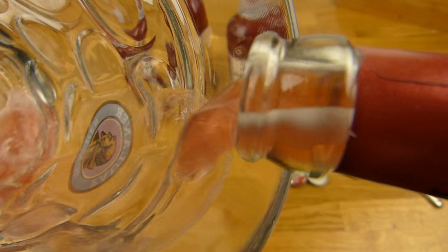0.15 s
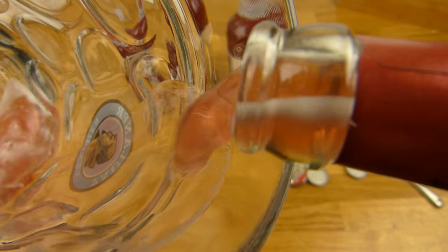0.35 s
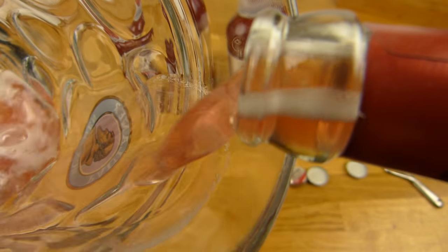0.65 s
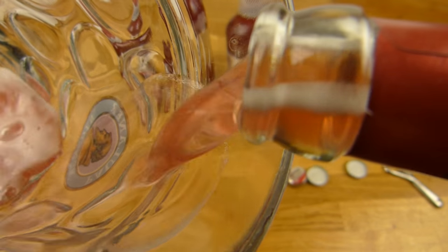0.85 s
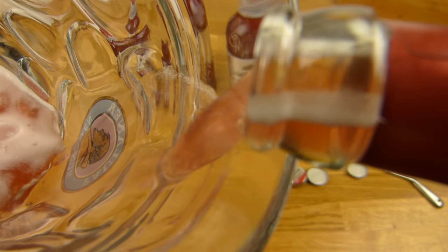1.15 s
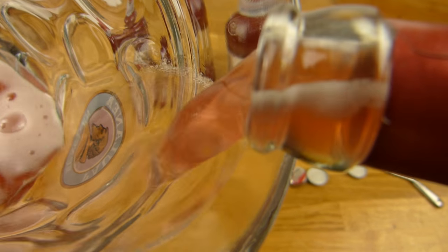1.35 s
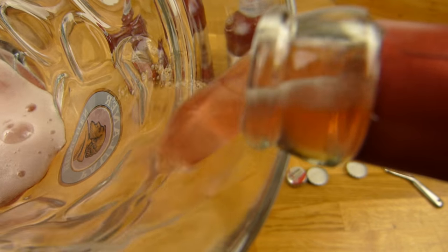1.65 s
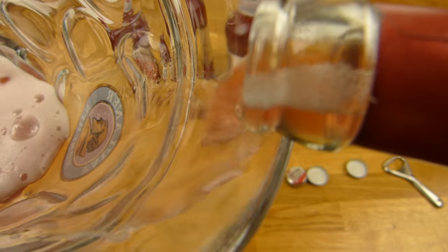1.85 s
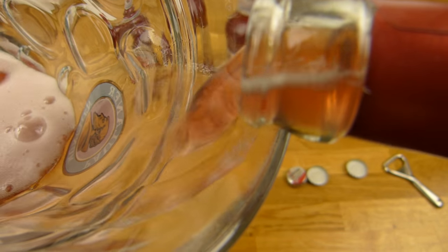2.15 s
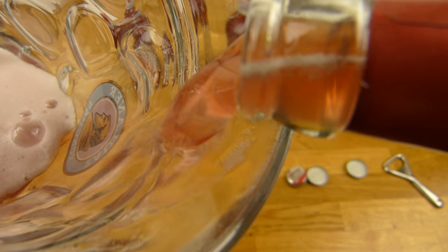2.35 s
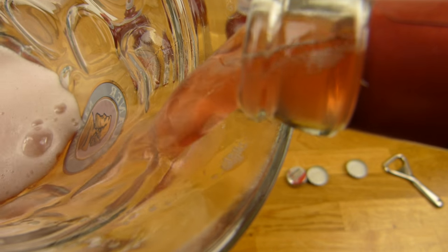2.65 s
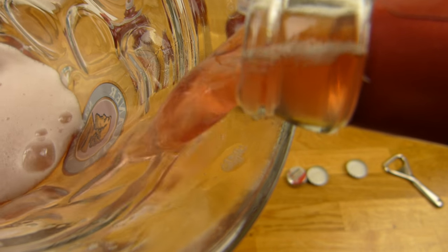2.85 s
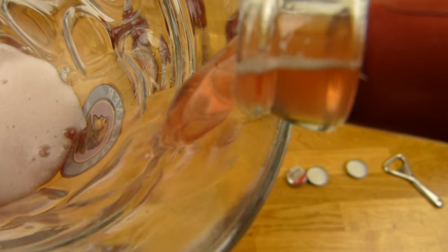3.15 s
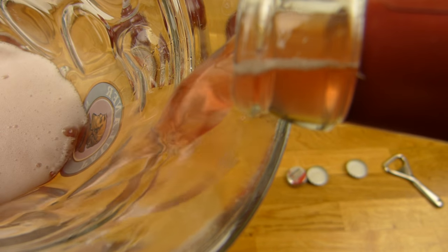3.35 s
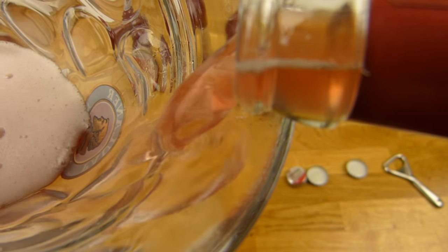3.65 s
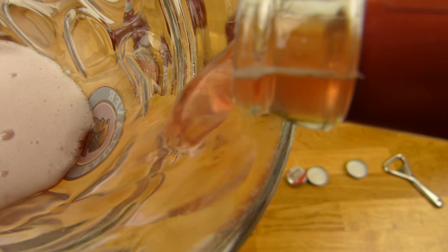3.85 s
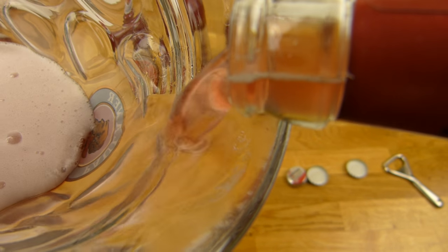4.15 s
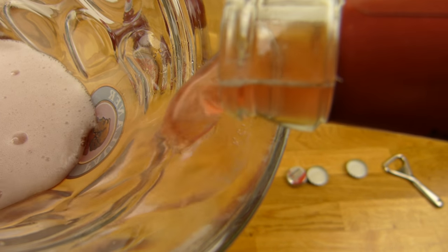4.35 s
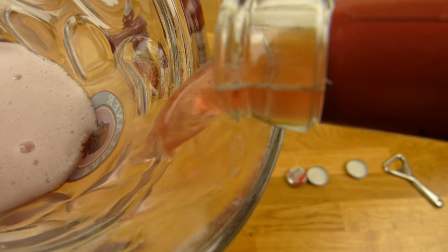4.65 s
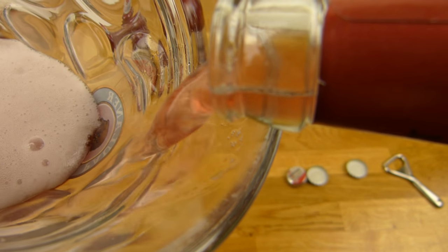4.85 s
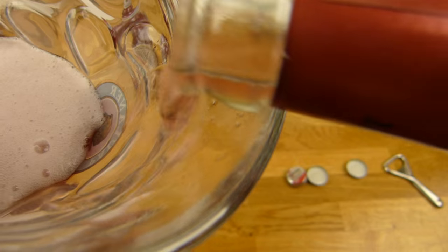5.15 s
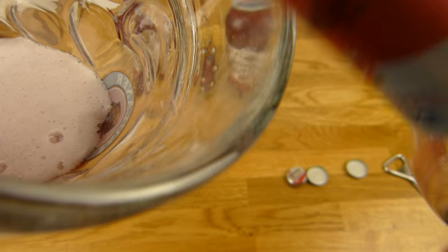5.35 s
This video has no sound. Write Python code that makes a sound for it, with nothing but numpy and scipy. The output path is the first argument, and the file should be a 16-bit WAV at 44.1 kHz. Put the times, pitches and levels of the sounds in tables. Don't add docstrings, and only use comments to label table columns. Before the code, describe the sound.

Close stereo pickup of a beer pour with little room echo. Bubbles gulp in the bottle neck, slugs of liquid slap into the mug and spatter, and glugs slow and fade. Fizz builds into an even, bright, crackling hiss with a slight hollow glass colour. Light glass taps occur near two seconds; toward the end the bottle clinks, knocks, rattles and slides on the rim over the fizz.

```python
import sys
import numpy as np
from scipy import signal
from scipy.fft import rfft, irfft
from scipy.io import wavfile
from scipy.ndimage import uniform_filter1d

SR = 44100
rng = np.random.default_rng(int(sys.argv[2]) if len(sys.argv) > 2 else 0)


def dump(signal):
    limited = np.clip(np.atleast_2d(signal).T, -1, 1)
    pcm = np.round(limited * 32767).astype(np.int16)
    wavfile.write(sys.argv[1], SR, pcm)


def linear_from_db(decibels):
    return 10 ** (np.asarray(decibels, float) / 20)


N = 242550


def evened(x):
    return x / np.sqrt(np.mean(x ** 2) + 1e-20)


def read(points, hz):
    f, value = np.transpose(points)
    return np.interp(np.log(hz + 1), np.log(f + 1), value)


def curve(rows, column=1):
    return np.interp(np.arange(N) / SR, np.array(rows)[:, 0], np.array(rows)[:, column])


def add(mix, s, sound):
    part = mix[..., round(s * SR):][..., :sound.shape[-1]]
    part += sound[..., :part.shape[-1]]


def cut(x, hz, kind):
    return signal.sosfilt(signal.butter(3, hz, kind, fs=SR, output="sos"), x)


def resonate(x, hz, width):
    return signal.lfilter(*signal.iirpeak(hz, hz / width, SR), x)


def colour(x, points):
    return irfft(rfft(x) * linear_from_db(read(points, np.fft.rfftfreq(N, 1 / SR))), N)


# (frequency [Hz], correlation)
LIKENESS = [(60, 0.16), (120, 0.82), (240, -0.55), (480, -0.66), (950, -0.54), (1890, 0.71), (3770, 0.91),
            (7520, 0.82), (15000, 0.85)]
# (frequency [Hz], left over right [dB])
BALANCE = [(60, 0.0), (120, -1), (240, -0.5), (480, 0), (950, 0), (1890, 2.2), (3770, 3.0), (7520, 1.5),
           (15000, 1)]


def spread(shared, unshared):
    hz = np.fft.rfftfreq(N, 1 / SR)
    same = np.clip(read(LIKENESS, hz), -1, 1)
    lean = linear_from_db(read(BALANCE, hz) / 2)
    left, other = rfft(shared), rfft(unshared)
    right = same * left + np.sqrt(1 - same ** 2) * other
    return irfft(np.array([left * lean, right / lean]), N)


def in_mug(x, modes, ring_db):
    return x + sum(linear_from_db(ring_db + db) * resonate(x, hz, width) for hz, width, db in modes)


def strike(modes, at_hz, blow_db, ring, cycles=0.39):
    hz, db, t60, lean_db, lag = np.transpose(modes)[:, :, None]
    t = np.maximum(np.arange(SR // 5) / SR - .0011, 0)
    db = db + read(sorted(zip(at_hz, blow_db)), hz)
    build = (1 - np.exp(-t / (0.00031 + cycles / hz))) ** 2
    body = linear_from_db(db - 60 * t / (t60 * ring)) * build
    ports = []
    for side in (1, -1):
        tone = np.sin(2 * np.pi * hz * t + side * lag / 2)
        ports.append((body * linear_from_db(side * lean_db / 2) * tone).sum(0))
    return np.array(ports)


def gulp(length, first_hz, last_hz, db):
    pinch_at, pinch_span = .65, 0.122
    kick_db, kick_s, louder_db_per_octave = 10.5, 0.018, 8
    t = np.arange(0, length, 1 / SR)
    octaves = np.log2(last_hz / first_hz) / (1 + np.exp((pinch_at - t / length) / pinch_span))
    level_db = db + kick_db * np.exp(-t / kick_s) + louder_db_per_octave * octaves
    return first_hz * 2 ** octaves, linear_from_db(level_db)


def glug(length, settled_hz, db):
    from_hz, settle_s = 59.7, 0.022
    peak_s, sharpness, linger_db = 0.026, 3.3, -14.5
    t = np.arange(0, length, 1 / SR)
    swell = (t / peak_s * np.exp(1 - t / peak_s)) ** sharpness
    linger = linear_from_db(linger_db) * np.minimum(t / peak_s, 1) ** 2
    return settled_hz - (settled_hz - from_hz) * np.exp(-t / settle_s), linear_from_db(db) * (swell + linger)


# (start [s], length [s], first pitch [Hz], last pitch [Hz], level [dB])
NECK_GULPS = [
    (0.0, 0.146, 179.5, 730, -59),
    (0.169, 0.11, 185.1, 509, -56),
    (0.362, 0.052, 251, 426, -57),
]
# (start [s], length [s], settled pitch [Hz], level [dB])
BOTTLE_GLUGS = [
    (0.547, 0.036, 180, -53),
    (0.745, 0.09, 163, -52),
    (0.985, 0.063, 163, -51.5),
    (1.235, 0.067, 154, -57),
    (1.526, 0.095, 157, -63.5),
    (2.135, .125, 158, -57),
]


def gulps():
    out = np.zeros(N)
    bubbles = [(s, gulp(*row)) for s, *row in NECK_GULPS]
    bubbles += [(s, glug(*row)) for s, *row in BOTTLE_GLUGS]
    for s, (hz, gain) in bubbles:
        fade = np.interp(np.arange(len(hz)), [0, 130, 0.91 * len(hz), len(hz)], [0, 1, 1, 0])
        tone = np.sin(2 * np.pi * np.cumsum(hz) / SR) * fade
        add(out, s, np.sqrt(2) * gain * tone)
    step, r = 2 * np.pi * 384 / SR, np.exp(-np.pi * 16 / SR)
    column = signal.lfilter([2 * np.sin(step) * (1 - r)], [1, -2 * r * np.cos(step), r * r], out)
    return linear_from_db(-2.5) * (out + linear_from_db(16.0) * column)


# (time [s], peak level [dB], pitch [Hz],
# t60 [s])
LONE_RINGS = [(0.0, -52, 383, 0.27), (0.008, -44, 1250, .2), (0.025, -39, 1139, 0.33),
              (0.0322, -11, 3160, 0.02), (0.0325, -32, 1930, .03), (0.053, -40, 1800, .04),
              (0.055, -46, 1218, .3), (0.061, -35.5, 2550, 0.082), (0.061, -35, 3620, .07),
              (0.1642, -10.5, 3550, 0.02), (0.1635, -24, 2920, 0.018), (0.3601, -23, 3540, 0.024),
              (0.452, -33, 2616, 0.069), (0.5786, -25.5, 3560, 0.043), (0.577, -18, 1600, .06),
              (0.8079, -10, 1608, .065), (0.645, -35, 2220, 0.068), (1.9016, -27, 5300, .025),
              (2.9045, -32, 3400, 0.04), (2.9085, -19, 4750, .016), (2.9085, -24, 4150, .014),
              (2.9087, -27, 5400, .012), (3.126, -19, 5900, .011), (3.0215, -31, 4920, .014),
              (3.1628, -32, 5400, .014), (3.243, -33, 5360, .03), (1.9012, -20, 6640, .016)]


def pings():
    out = np.zeros((2, N))
    for s, db, hz, t60 in LONE_RINGS:
        add(out, s, strike([(hz, -4.0, t60, 1.5, .3)], [hz], [db], 0.54))
    return out


def patchy(x):
    z = signal.stft(x, nperseg=256)[2]
    field = rng.standard_normal(z.shape[1:])
    field = uniform_filter1d(field, size=5, axis=0)
    field = uniform_filter1d(field, size=30, axis=1)
    return signal.istft(z * linear_from_db(0.9 * evened(field)), nperseg=256)[1][:, :N]


# (time [s], fizz level [dB], larger bubbles level [dB], ring of the air above [dB])
FOAM_COURSE = [
    (0.0, -54, -48.5, 0.1),
    (0.13, -63, -72.5, 0.1),
    (0.7, -53, -68, 0.1),
    (1.3, -49, -70.5, 0.1),
    (1.74, -48, -64, 0.1),
    (2.48, -48, -59.5, 2.5),
    (3.02, -49, -63, -0.8),
    (3.6, -48.5, -61.5, -1.2),
    (4.21, -48, -60, -2.5),
    (5.5, -46.5, -56, -3),
]
# (frequency [Hz], density [dB per Hz])
SMALL_BUBBLES = [(880, -39), (1500, -12.5), (1920, -11.5), (2640, -9), (2940, -2.5), (3220, -3),
                 (4120, -2.5), (5660, 1), (6310, 2.5), (9470, -4.5), (16000, -24.5)]
# (frequency [Hz], density [dB per Hz])
LARGE_BUBBLES = [(300, -10), (700, -2), (1200, -3), (2000, 4), (2800, -20.5), (4000, -31)]
# (frequency [Hz], width [Hz], level [dB])
AIR_COLUMN = [(393, 27, -18), (1236, 77, 9.5), (2310, 420, -19.5), (2640, 367, 12), (3588, 125, 16.5),
              (4110, 110, 15), (4860, 330, 7.5), (5100, 93, -5), (5670, 54, -32), (7600, 900, 2.5)]


def fizz():
    bursts = rng.random((2, 2, N)) < 9000 / SR
    sign = rng.choice([-1., 1.], bursts.shape)
    size = sign * linear_from_db(2.8 * np.minimum(rng.exponential(1, bursts.shape), 5))
    swell = uniform_filter1d(rng.standard_normal(N), size=900)
    swell = evened(uniform_filter1d(swell, size=900))
    small, large = bursts * size * linear_from_db(0.61 * swell)
    ring_db = -12.0 + curve(FOAM_COURSE, column=3)
    small = evened(in_mug(colour(small, SMALL_BUBBLES), AIR_COLUMN, ring_db))
    large = evened(in_mug(colour(large, LARGE_BUBBLES), AIR_COLUMN, 5.0))
    small = linear_from_db(curve(FOAM_COURSE)) * small
    large = linear_from_db(curve(FOAM_COURSE, column=2) + 1.0) * large
    return spread(*patchy(small + large))


# (frequency [Hz], density [dB per Hz])
KITCHEN_HUM = [(12, -40), (20, -11.5), (92, -11), (171, -11.5), (288, -2.5), (318, -9.5), (383, 1.5),
               (416, -3), (841, -8), (1100, -11), (1430, -9.5), (2420, -120)]


def room():
    return linear_from_db(-62) * evened(spread(*colour(rng.standard_normal((2, N)), KITCHEN_HUM)))


# (time [s], blow [dB], boom [dB], slap [dB], closing bubble [dB])
SLUGS = [(0.008, -45, -52, -52, -70), (0.0316, -43.5, -61, -44, -70), (0.162, -23, -32, -27, -24.5),
         (0.2368, -42, -48, -56, -43), (0.28, -38, -48, -43, -60), (0.3592, -31, -35, -26, -32.5),
         (0.4622, -47, -48.5, -38, -60), (0.4746, -66, -49.5, -34, -70),
         (0.5772, -30.5, -40.5, -23.5, -28.5), (0.6419, -48, -47, -34, -62),
         (0.8082, -24.5, -37, -18.5, -25.5), (1.063, -40, -45, -33.5, -58),
         (1.3672, -39.5, -50.5, -34.5, -47), (2.5806, -55, -63, -49, -65), (3.246, -59, -90, -60, -60),
         (5.4189, -52, -83, -60, -58)]
SLUG_HZ = (1240, 385, 1800, 750)
# (frequency [Hz], level [dB], t60 [s], left over right [dB], right lag [rad])
MUG_AND_BEER = [(382, 3.5, .165, 1.5, 0.37), (734, 19, 0.012, -0.5, 0.55), (1159, -1, 0.032, -1, 0.37),
                (1250, 5, 0.032, 1.5, 0.36), (1222, -16, 0.12, 4, 0.38), (1395, 3.5, 0.02, 2, 0.24),
                (1654, 6.5, 0.015, 0, 0.4), (1880, 0.5, 0.017, 3, 0.58), (2350, -11, 0.014, 6, 0.27)]


def plops():
    close_s, deeper_s_per_s = .0054, 0.00305
    hollow_db = -9.5
    out = np.zeros((2, N))
    t = np.arange(round(0.0201 * SR)) / SR
    note = np.sin(2 * np.pi * np.cumsum(np.linspace(1430, 1040, len(t))) / SR)
    bubble = note * np.sin(np.pi * (t / t[-1]) ** 1.15) ** 1.4 * linear_from_db(94 * t - 3.5)
    for s, db, boom_db, slap_db, bubble_db in SLUGS:
        blow = (db, boom_db, slap_db, (boom_db + slap_db) / 2 + hollow_db)
        add(out, s, strike(MUG_AND_BEER, SLUG_HZ, blow, 0.97, 0.1))
        closed = s + close_s + deeper_s_per_s * min(s, 1)
        add(out, closed, linear_from_db(bubble_db + np.array([[.9], [-.9]])) * bubble)
    return out


# (time [s], peak level [dB], pitch [Hz])
ROUND_DROPS = [(0.0095, -29, 3650), (0.0189, -26, 4530), (0.023, -27.5, 5360), (0.0326, -23, 3570),
               (0.0394, -23, 6440), (0.1645, -24, 3600), (0.27, -35, 7160), (0.2768, -20, 7400),
               (0.3603, -22, 5750), (0.403, -36, 4870), (0.4319, -21.5, 4870), (0.4535, -33, 2570),
               (0.4628, -18, 6040), (0.4657, -15, 5070), (0.476, -28, 4660), (0.579, -22, 5750),
               (0.615, -29, 4900), (0.6195, -23.5, 5730), (0.6383, -18, 5360), (0.839, -23, 5700),
               (1.0464, -25, 5870), (1.056, -21, 6300), (1.5478, -32, 4350), (1.9022, -34, 5300),
               (2.6419, -34, 4000), (2.9085, -40, 4700), (3.127, -33, 5900), (3.1628, -37, 3700)]
# (time [s], peak level [dB], pitch [Hz])
SPRAY_DROPS = [(0.0607, -23, 4200), (0.1935, -30.5, 2560), (0.2213, -22.5, 5360), (0.229, -21, 7900),
               (0.2436, -27, 4870), (0.25, -23.5, 5330), (0.2809, -20, 4340), (0.423, -24.5, 9100),
               (0.6443, -22.5, 2480), (0.752, -31.5, 6840), (0.8095, -30, 5760), (0.817, -13, 5900),
               (0.8648, -25.5, 4220), (1.0074, -31, 4880), (1.067, -15, 4940), (1.3683, -26.5, 6260),
               (3.023, -33, 4920), (3.2425, -36, 5260)]
# (frequency [Hz], width [Hz], level [dB])
CROSS_MODES = [(2550, 100, 14), (2940, 190, 7), (3605, 74, 12), (4880, 190, 9), (5750, 300, 1.5),
               (6500, 1650, 0.5), (7300, 1040, 3)]


def spatter():
    out, t = np.zeros((2, N)), np.arange(SR // 10) / SR
    droplets = [(*row, -30.5, 0.026) for row in ROUND_DROPS]
    droplets += [(*row, -12.5, 0.03) for row in SPRAY_DROPS]
    for s, db, hz, treble_db, t60 in droplets:
        decay = linear_from_db(-60 * t / (1.34 * t60)) + linear_from_db(-5.0 - 60 * t / t60)
        spray = np.roll(rng.standard_normal((2, len(t))) * decay, 40, axis=1)
        spray[:, 40] += 14.0
        snap = resonate(resonate(spray, hz, 0.65 * hz), hz, 0.65 * hz)
        hiss = resonate(resonate(spray, 6500, 10000), 6500, 10000)
        snap = snap + linear_from_db(treble_db + 9.0) * hiss
        add(out, s, linear_from_db(db - 7) * snap / abs(snap[0]).max())
    out = cut(cut(out, 1600, "high"), 11500, "low")
    ring_db = 1 - 4.5 * np.minimum(np.arange(N) / SR, 1.6)
    return spread(*in_mug(out, CROSS_MODES, ring_db))


# (frequency [Hz], t60 [s])
KITCHEN_T60 = [(130, 0.61), (400, 0.14), (1200, 0.27), (2000, 0.15), (5000, 0.11), (12000, 0.27)]


def kitchen(x):
    taps = np.zeros((2, SR // 2))
    at = np.arange(300, SR // 2 - 20, 20) + rng.integers(0, 20, (2, (SR // 2 - 301) // 20))
    np.put_along_axis(taps, at, rng.choice([-1., 1.], at.shape), 1)
    hz, t, z = signal.stft(taps + 0.32 * taps[::-1], SR, nperseg=256)
    decay = linear_from_db(-60 * t / read(KITCHEN_T60, hz)[:, None])
    tail = signal.istft(z * decay, SR, nperseg=256)[1]
    return signal.fftconvolve(x, tail / np.linalg.norm(tail[0]), axes=1)[:, :N]


# (time [s], peak level [dB], pitch [Hz])
WALL_SLAPS = [
    (0.356, -43, 256),
    (0.806, -30, 318),
    (0.89, -64, 145),
    (1.064, -34, 150),
    (1.244, -56, 133),
    (1.366, -40.5, 277),
    (1.532, -44, 213),
    (1.785, -44, 326),
    (5.253, -55, 315),
]


def thumps():
    out = np.zeros((2, N))
    for s, db, hz in WALL_SLAPS:
        add(out, s, strike([(hz, 6.0, .03, 0, .1)], [hz], [db], 0.51))
    return out


def choked(sound, s, db):
    return sound * linear_from_db(db * np.clip((np.arange(sound.shape[-1]) / SR - s) / .0015, 0, 1))


def gaps(rows):
    return np.diff(np.array(rows)[:, 0], append=N)


# (time [s], blow [dB], thud [dB], hardness [dB], rim edge [dB])
TILTED_TAPS = [(1.786, -58, -52, -60, -60), (1.8187, -38.5, -41, -39, -39.5),
               (1.8418, -39, -39.5, -48, -38), (1.8573, -40, -40, -48, -38), (1.8691, -43, -43, -45, -43),
               (1.8832, -32.5, -44, -37, -47), (1.9119, -47, -45, -48, -50), (1.929, -50, -51, -56, -56),
               (2.5617, -71, -59, -54, -49), (2.7933, -53, -48.5, -58, -48.5), (2.8135, -52, -51, -61, -61),
               (2.8415, -55, -52, -55, -51)]
TILTED_BLOW_HZ = (1860, 440, 3400, 4200, 760)
# (frequency [Hz], level [dB], t60 [s], left over right [dB], right lag [rad])
TILTED_GLASS = [(406.6, 4.5, 0.14, 2.5, 0.67), (622, 12, 0.036, -3, 1.65), (1157, 16, 0.02, -1.5, 1.9),
                (1670, -8, 0.03, 4, .6), (1892, 0.5, 0.093, 3.5, 1.14), (3384, 1.5, 0.11, -4.5, 0.31),
                (4207, 3.5, 0.047, 3, .4), (4870, -8, 0.043, 2, 0.32)]


def tilted_taps():
    out, wall_db = np.zeros((2, N)), -9.5
    for (s, db, thud_db, *hard_db), gap in zip(TILTED_TAPS, gaps(TILTED_TAPS)):
        blow = (db, thud_db, *hard_db, thud_db + wall_db)
        add(out, s, choked(strike(TILTED_GLASS, TILTED_BLOW_HZ, blow, 0.82), gap, -7.0))
    return out


# (time [s], blow [dB], thud [dB], hardness [dB], share of free ring)
FULL_TAPS = [(4.838, -17.5, -34, -20.5, 0.9), (4.8554, -19.5, -35, -25.5, 0.73),
             (4.8673, -20, -36, -26.5, 0.8), (4.8774, -20, -39, -35, 0.6), (4.8866, -21, -38, -38, 0.8),
             (4.894, -24, -41, -33, 0.9), (4.9047, -32, -40, -36, 0.89), (4.916, -35, -43, -43, .8),
             (4.9275, -30, -43, -46, 0.75), (4.936, -33, -43, -39, 0.5), (5.285, -33, -60, -60, .9),
             (5.331, -56, -40, -64, 0.6)]
FULL_BLOW_HZ = (1860, 440, 3800, 760)
FULL_GLASS_HZ = (441, 570, 760, 1240, 1410, 1590, 1850, 1864, 1880, 1935, 2350, 3255, 3598, 3662, 3720,
                 3850, 4070, 4152, 4230, 5095, 5742)
# (level [dB], t60 [s], left over right [dB], right lag [rad])
FULL_GLASS_RING = [(2.5, 0.14, 5, 0.53), (17.5, 0.012, -4.5, 4), (10.5, 0.031, -4.5, 1.56),
                   (-4.5, 0.068, -3.5, 1.4), (-3, 0.022, 18.5, 1.3), (6.5, 0.017, 3, 1.9),
                   (-17.5, 0.26, -8, 0.93), (-8.5, 0.19, 4, 0.34), (-18, 0.39, 1, 0.51),
                   (-12, 0.11, 8, 1.1), (-9, 0.044, 0, 0.56), (-11, 0.11, -4, 0.64), (-8, 0.1, -4.5, 0.68),
                   (-1, 0.19, -3, .5), (-31, 0.1, 14, 0.26), (-2, 0.058, -5, 0.38), (-14, 0.034, 9, 0.28),
                   (3, 0.03, 2, 0.31), (-18, 0.013, 1, .4), (-5, 0.02, -1.5, 0.22), (-10, 0.03, 2, 0.22)]
FULL_GLASS = np.column_stack([FULL_GLASS_HZ, FULL_GLASS_RING])


def full_taps():
    out, wall_db = np.zeros((2, N)), -1
    for (s, db, thud_db, hard_db, ring), gap in zip(FULL_TAPS, gaps(FULL_TAPS)):
        blow = (db, thud_db, hard_db, thud_db + wall_db)
        add(out, s, choked(strike(FULL_GLASS, FULL_BLOW_HZ, blow, ring), gap, -8.0))
    return out


# (frequency [Hz], level [dB], t60 [s], left over right [dB], right lag [rad])
CLINK_MODES = [(436, -31.5, 0.1, 4, 0.45), (740, -24.5, 0.021, 0, 1.2), (1195, -27.5, .03, -3, 1.1),
               (1560, -23.5, .025, 4, 1.9), (1865, -27.5, 0.21, 2, 0.48), (1840, -43, .35, 1, .5),
               (1950, -22, 0.056, 6, 1.1), (2352, -30, .04, 0, .5), (3586, -24.5, 0.12, -5, .7),
               (3660, -32, .06, -5, .6), (3800, -38, .05, -4, .4), (4110, -18.5, 0.026, 3, .3),
               (5093, -28, 0.022, -1, .2), (5700, -38, .05, 2, .2)]
KNOCK_MODES = [(441, -29, 0.11, 6, .5), (740, -21.5, 0.023, -1, 1.5), (1220, -22.5, .03, -3, 1.4),
               (1580, -17.5, .02, 6, 1.9), (1945, -21, .03, 5, .8), (2353, -23, 0.041, -1, .5),
               (3250, -27, .07, -4, .6), (3640, -22.5, 0.062, -2, .6), (3850, -23, 0.088, -6, .4),
               (4130, -25, 0.078, 0, .3), (4200, -10, 0.021, 1, .3), (5090, -14, 0.026, -1, .2),
               (5740, -23, 0.033, 2, .2), (8100, -36.5, 0.048, 5, .2)]
HELD_MODE = (1862, -12.5, .085, 3.5, .4)
BUMP_MODES = [(440, -20.5, 0.135, 4, .5), (560, -10.5, 0.011, -7, 3.6), (750, -12, .016, -3, 1.3),
              (1125, -33, .08, -3, 1.3), (1346, -33, .05, 0, 1.3), (1567, -30, .04, 4, 1.6),
              (1869, -35, .2, 2, .4), (1950, -28, 0.05, 6, 1.1), (2340, -39, .04, 0, .5),
              (3295, -37, .04, -4, .6), (3720, -37.5, .1, -3, .6), (4160, -38, .04, 2, .3)]


def knocks():
    out = np.zeros((2, N))
    clink_s, knock_s, bump_s = 4.4105, 4.8015, 5.2522
    chatter_s, chatter_db = .0038, -7
    add(out, knock_s, choked(strike([HELD_MODE], [1], [0], 1, 1.5), .0195, -20.0))
    for s, modes in ((clink_s, CLINK_MODES), (knock_s, KNOCK_MODES), (bump_s, BUMP_MODES)):
        ring = strike(modes, [1], [0], 1)
        add(out, s, ring)
        add(out, s + chatter_s, linear_from_db(chatter_db) * ring)
    return out


# (strongest time [s], rub [dB], rise [dB/s], fall [dB/s], low groan share [dB])
RIM_SLIDES = [
    (4.874, -37, 1100, 286, 0),
    (5.15, -66, 250, 300, 9),
    (5.195, -52, 500, 900, -8),
    (5.29, -46, 600, 400, -25),
]


def slide():
    t, force = np.arange(N) / SR, np.zeros((2, N))
    for s, db, rise, fall, groan_db in RIM_SLIDES:
        force += linear_from_db(db + np.minimum(rise * (t - s), fall * (s - t)) + np.array([[0], [groan_db]]))
    slips = rng.standard_normal(N) * (rng.random(N) < 1500 / SR) * linear_from_db(-13.5) * force
    out = np.zeros((2, N))
    for modes, push in zip((FULL_GLASS[3:], FULL_GLASS[:3]), slips):
        ring = strike(modes, FULL_BLOW_HZ, (1.5, 1.5, 1.0, -7.5), 0.95)
        out += signal.oaconvolve(push[None], ring, axes=1)[:, :N]
    return out


def clinks():
    return cut(tilted_taps() + full_taps() + knocks() + slide(), 300, "high")


# (time [s], level [dB], t60 [s])
CONTACT_CRACKS = [(1.82, -44, .04), (1.843, -46, .04), (1.858, -47, .04), (1.884, -44, .05),
                  (1.913, -52, .04), (4.4115, -34, .03), (4.8025, -28, .03), (4.839, -31, .04),
                  (4.8565, -35, .04), (4.8685, -35, .04), (4.8875, -38, .05), (4.906, -41, .06),
                  (5.2535, -28, .025), (5.262, -44, .2)]
# (frequency [Hz], density [dB per Hz])
CRACK_COLOUR = [(300, -20), (600, -4), (1200, 0), (1600, 0), (2400, -5), (2900, -16), (3700, -6),
                (6500, -30)]
# (strongest time [s], level [dB], rise [dB/s], fall [dB/s], pitch [Hz])
BOWED_MODES = [
    (5.162, -45, 1500, 200, 441),
    (5.197, -43.5, 300, 550, 441),
    (5.249, -45, 2500, 2500, 441),
    (5.197, -49, 900, 900, 1930),
    (5.19, -50, 600, 600, 3750),
]


def contact():
    t, force = np.arange(SR // 5) / SR, np.zeros(N)
    for s, db, t60 in CONTACT_CRACKS:
        add(force, s, linear_from_db(db - 60 * t / t60))
    a, b = rng.standard_normal((2, N)) * force
    ports = np.array([a + .6 * b, a - .6 * b])
    out = linear_from_db(6.0) * cut(colour(ports, CRACK_COLOUR), 350, "high")
    for s, db, rise, fall, hz in BOWED_MODES:
        u = t - t[-1] / 2
        level = linear_from_db(db + np.minimum(rise * u, -fall * u) + np.array([[2.2], [-2.2]]))
        add(out, s + u[0], level * np.sin(2 * np.pi * hz * (s + u) + np.array([[.25], [-.25]])))
    return out


def scene():
    near = cut(plops() + thumps() + pings(), 100, "high")
    near = near - 0.81 * resonate(near, 484, 140)
    near = near + clinks() + spatter() + gulps() * linear_from_db(np.array([[-.5], [.5]]))
    return near + linear_from_db(-12.5) * kitchen(near) + fizz() + room() + contact()


def band_limit(x):
    return signal.sosfilt(signal.butter(12, 15800, fs=SR, output="sos"), x)


def record(dry):
    ceiling = .62
    limited = ceiling * np.tanh(dry / ceiling)
    narrow = signal.oaconvolve(limited, signal.firwin(255, 16300, fs=SR)[None], "same")
    return band_limit(narrow)


dry = scene()
out = record(dry)
dump(out)
```